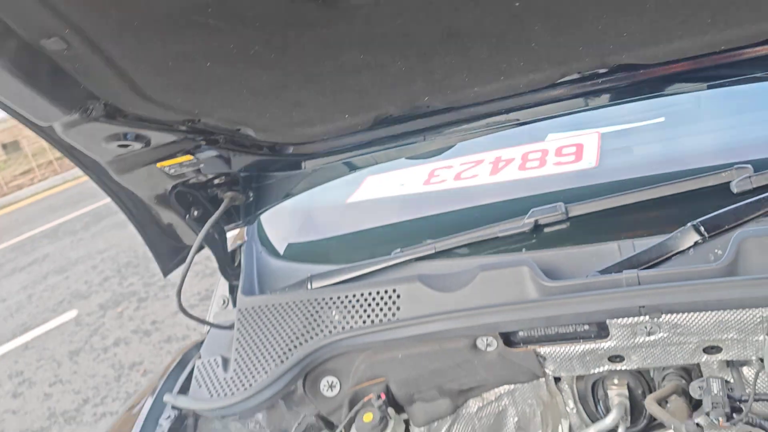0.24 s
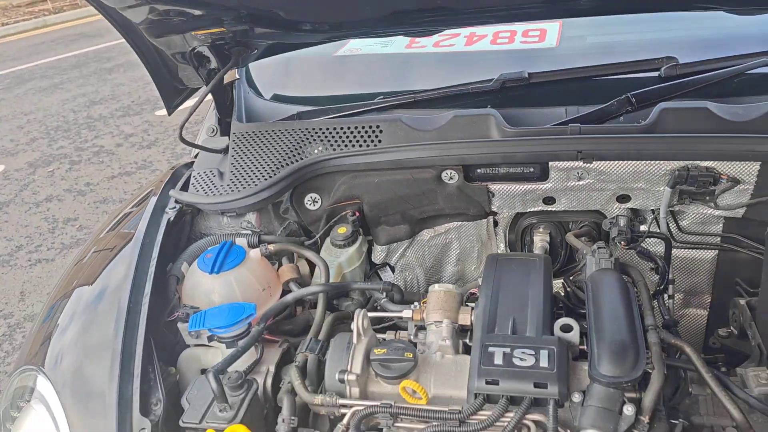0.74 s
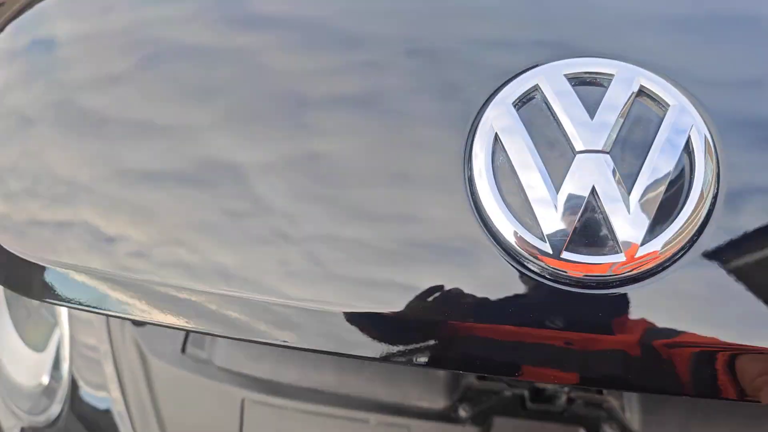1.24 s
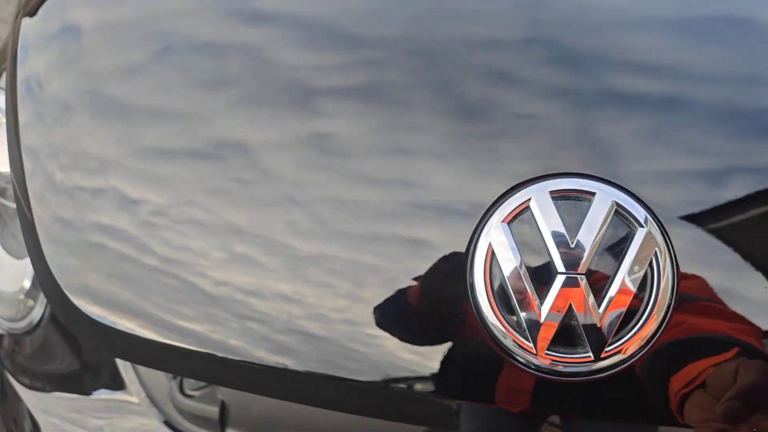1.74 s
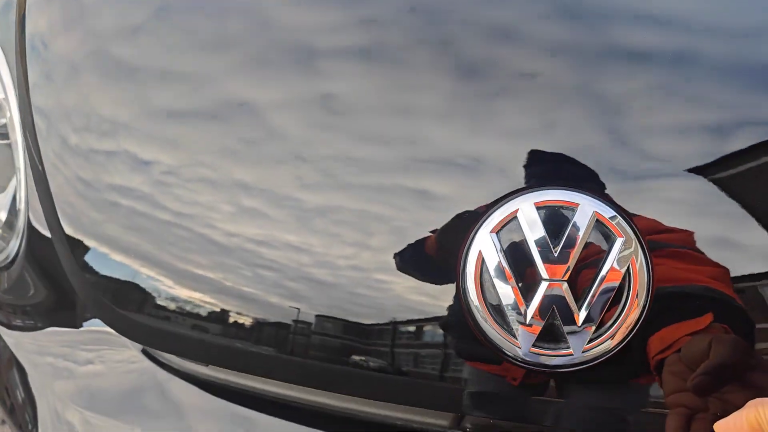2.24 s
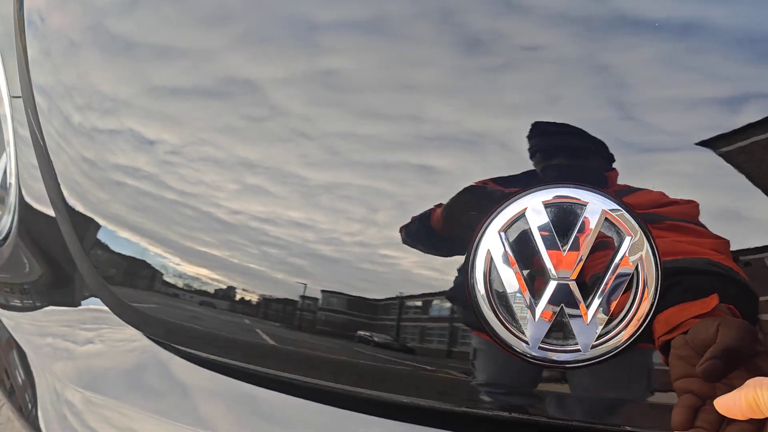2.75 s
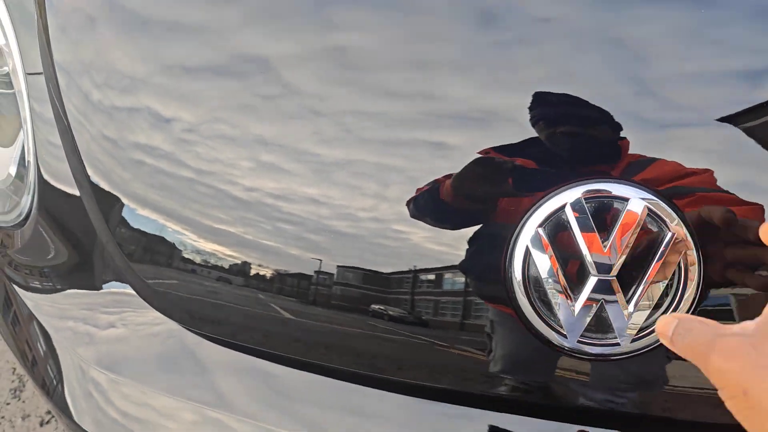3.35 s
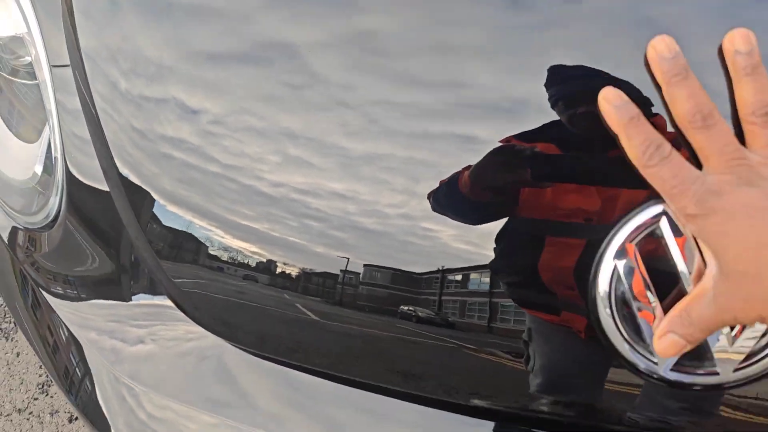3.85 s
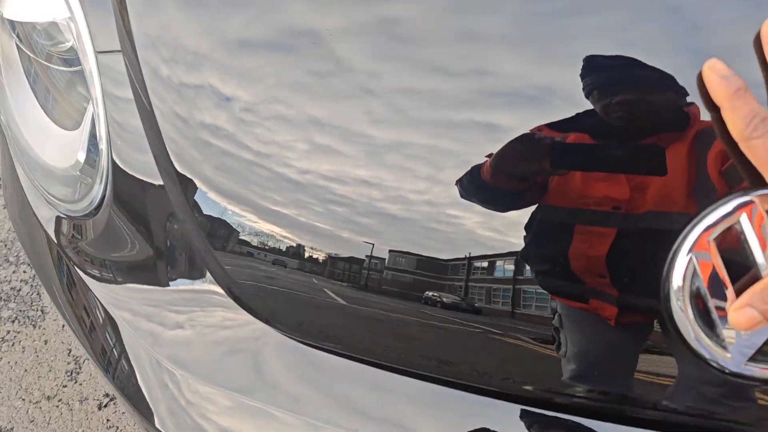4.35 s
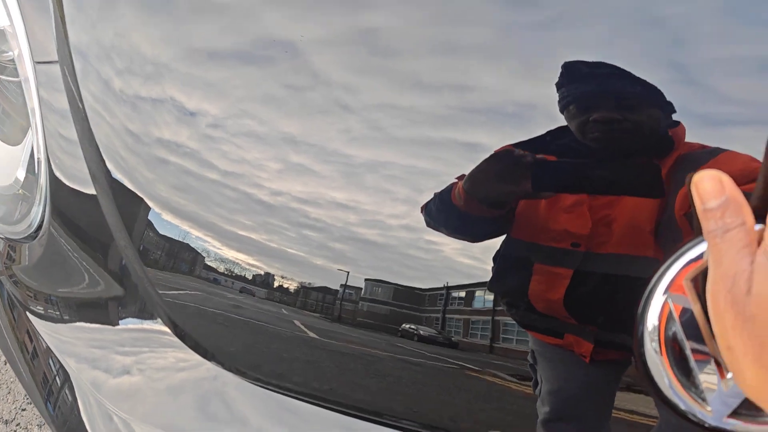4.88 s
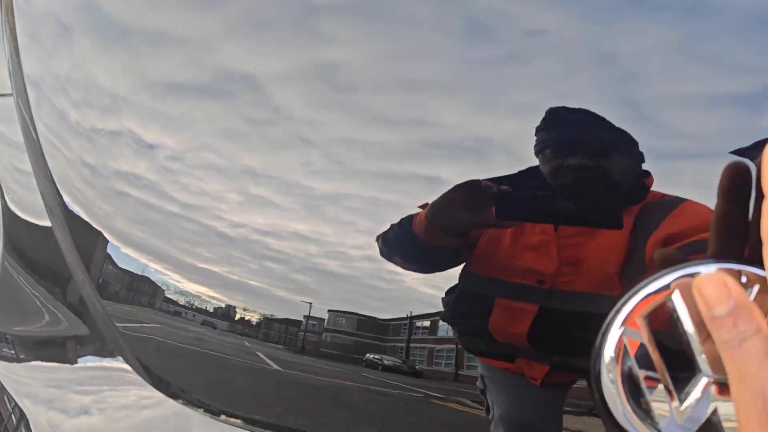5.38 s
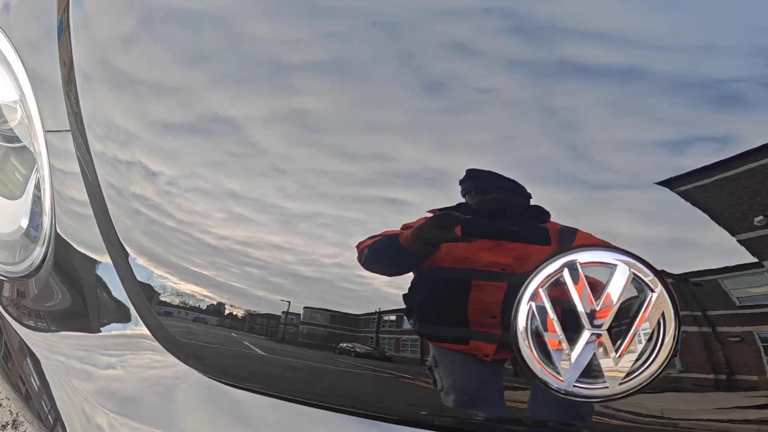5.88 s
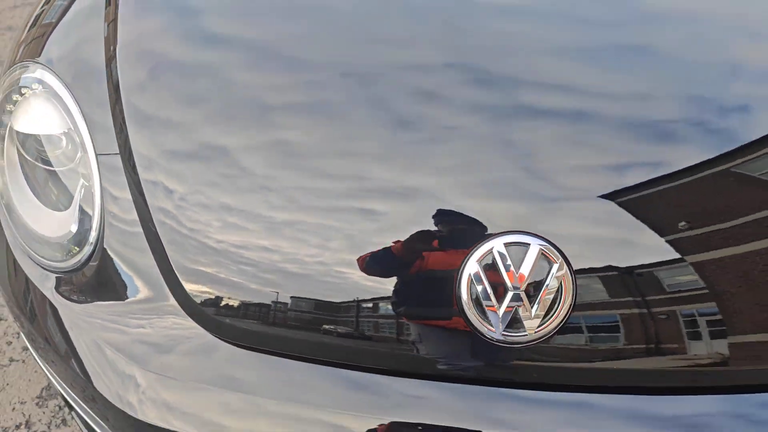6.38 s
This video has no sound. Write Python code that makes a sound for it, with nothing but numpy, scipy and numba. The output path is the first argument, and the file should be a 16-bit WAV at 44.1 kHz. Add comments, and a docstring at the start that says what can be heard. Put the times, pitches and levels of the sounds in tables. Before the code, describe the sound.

In a car park, an engine idles close to a phone microphone, with fast bright ticking, hiss and a thin whine over a low rumble. The bonnet is lowered and the engine turns dull and quiet. The bonnet then drops and is pushed onto its latch, four loud metallic thuds in all, with clanks and sharp cracks. A sleeve swishes faintly while the muffled idle carries on.

```python
"""In a car park, a four-cylinder engine idles under a raised bonnet, with a phone held over it.
Injectors and valves tick at each firing, a pump whines, and exhaust and far traffic rumble.
The bonnet is lowered and muffles the engine, then is dropped and pushed onto its latch four times:
the metal panel thuds and clanks, and the latch cracks. A sleeve swishes between and after the pushes."""
import sys
import numpy as np
from scipy import signal
from scipy.fft import rfft, irfft, next_fast_len
from scipy.io import wavfile
from scipy.ndimage import uniform_filter1d
from numba import njit

SR = 44100
rng = np.random.default_rng(int(sys.argv[2]) if len(sys.argv) > 2 else 0)


def bounce(signal):
    """Save signal as a 16-bit WAV file at the path given by the first command-line argument."""
    frames = np.transpose(np.atleast_2d(signal))
    limited = np.clip(frames, -1, 1)
    pcm = np.round(limited * 32767).astype(np.int16)
    wavfile.write(sys.argv[1], SR, pcm)


N = 291942
FFT = next_fast_len(N)
TIME = np.arange(N) / SR
LEFT_RIGHT = np.array([[1], [-1]])


def undb(db):
    return 10 ** (np.asarray(db) / 20)


def unit(x):
    return x / np.sqrt(np.mean(x ** 2))


def ramp(start, length):
    """0 before start, 1 after start + length."""
    return np.clip((TIME - start) / length, 0, 1)


def over_time(table):
    """Read a table of times and values at every sample."""
    times, *columns = np.transpose(table)
    return [np.interp(TIME, times, column) for column in columns]


def over_hz(table):
    """Read a table of frequencies and values across the spectrum."""
    hz, value = np.transpose(table)
    return np.interp(np.log(np.fft.rfftfreq(FFT, 1 / SR) + 1), np.log(hz), value)


def filtered(x, order, hz, kind="low"):
    return signal.sosfilt(signal.butter(order, hz, kind, fs=SR, output="sos"), x)


def colour(x, spectrum, peaks=(), peaks_db=0.):
    """Give a sound a broad tone colour plus ringing peaks; its strength (rms) comes out as 1."""
    hz, power = np.fft.rfftfreq(FFT, 1 / SR), undb(2 * over_hz(spectrum))
    for centre, width, db in peaks:
        power = power + undb(2 * (db + peaks_db)) / (1 + (2 * (hz - centre) / width) ** 2) ** 2
    # this fold makes the filter ring after a sound, never before it
    cepstrum = irfft(np.log(power) / 2, FFT)
    cepstrum[1:FFT // 2] *= 2
    cepstrum[FFT // 2 + 1:] = 0
    return unit(irfft(rfft(x, FFT) * np.exp(rfft(cepstrum)), FFT)[:, :N])


def wander(rate):
    """A smooth random wobble of about 1, with rate new values a second."""
    hold = int(SR / rate)
    steps = np.repeat(rng.standard_normal(N // hold + 1), hold)
    return 1.72 * uniform_filter1d(uniform_filter1d(steps, hold), hold)[:N]


def fading(seconds, sizes, decay_ms, rise_ms):
    """A loudness curve that jumps at each given time and dies away."""
    kicks = np.zeros(N)
    at = (seconds * SR).astype(int)
    inside = (at >= 0) & (at < N)
    np.add.at(kicks, at[inside], sizes[inside])
    for ms in decay_ms, rise_ms:
        kicks = signal.lfilter([1], [1, -np.exp(-1000 / SR / ms)], kicks)
    return kicks * 1000 / SR / rise_ms


@njit
def ringing(kicks, hz, ring_s):
    """One note of a struck object: each kick starts it, and it falls 60 dB in ring_s."""
    pole = np.exp(2j * np.pi * hz / SR - np.log(1000) / ring_s / SR)
    out = np.zeros(kicks.shape)
    for side in range(len(kicks)):
        state = 0j
        for i in range(kicks.shape[1]):
            state = state * pole + kicks[side, i] + 1e-18
            out[side, i] = state.imag
    return out


# How alike left and right are: f/Hz, likeness/0..1
LIKENESS = [(60, 0.86), (300, 0.89), (640, 0.77), (1400, 0.022), (3000, 0.027), (16000, 0.026)]
# Which side is louder: f/Hz, left minus right/dB
BALANCE = [(60, -1), (110, 0), (200, -2), (380, -2), (700, 2), (1290, 5.5), (2380, 4.5), (4400, 0),
           (8120, 0), (15000, 3)]

def stereo_noise():
    """Noise at the phone's two microphones: alike in the bass, unrelated in the treble."""
    alike = np.clip(over_hz(LIKENESS), 0, 1)
    mid, side = rfft(rng.standard_normal((2, FFT)))
    pair = np.sqrt(1 + alike) * mid + LEFT_RIGHT * np.sqrt(1 - alike) * side
    return unit(irfft(pair * undb(LEFT_RIGHT * over_hz(BALANCE) / 2), FFT)[:, :N])


# Loudness over time: t/s, engine through the bonnet gap/dB, rumble/dB
GAP_AND_RUMBLE_LEVELS = [(0, -29, -45), (.4, -28.5, -49), (.7, -29, -51.5), (1.07, -32.5, -49.5),
                         (1.36, -44.5, -48), (1.6, -50, -52), (2.0, -52.5, -48), (2.4, -55, -51.5),
                         (3.1, -60, -51.5), (4.0, -60, -57.5), (4.5, -64.5, -53), (5.0, -63, -60.5),
                         (5.8, -60, -57.5), (6.62, -60, -62.5)]
# Tone colour of the rumble: f/Hz, level/dB
RUMBLE_COLOUR = [(15, -42), (25, -20), (38, -10.5), (59, -10), (76, -6.5), (97, 5.5), (210, -1.5),
                 (264, -1), (353, -9), (450, -9.5), (580, -37), (990, -120)]

def rumble():
    """Exhaust and far traffic make a low, uneven noise."""
    _, level_db = over_time(GAP_AND_RUMBLE_LEVELS)
    return undb(level_db + 1.76 * wander(20.96)) * colour(stereo_noise(), RUMBLE_COLOUR)


# Brushes of the sleeve: t/s, length/s, level/dB
SWISHES = [(3.497, 0.26, -58.5), (5.59, 0.17, -56), (5.748, 0.28, -49)]
# Tone colour of the cloth: f/Hz, level/dB
CLOTH_COLOUR = [(1180, -20), (2000, 1), (2160, -13), (2340, 0.5), (5630, 1), (8400, -8), (12900, 0.5),
                (16000, -12)]

def sleeve():
    """Cloth rubs on cloth: soft swells of high hiss."""
    swell = sum(undb(db) * np.sin(np.pi * ramp(start, length)) ** 0.98 for start, length, db in SWISHES)
    return swell * undb(0.75 * wander(40)) * colour(stereo_noise(), CLOTH_COLOUR)


def idle_swell():
    """Goes from 0 to 1 and back as the whine and muffled engine swell between two pushes."""
    return ramp(4.47, 0.23) - ramp(5.2, 0.23)


def pump_whine(pitch_hz=1009, sag_hz=26, waver_hz=5.98, hiss_width_hz=57):
    """A belt-driven pump sings a wavering tone in a narrow hiss; it sags as the bonnet comes down."""
    hz = pitch_hz - sag_hz * (ramp(.3, .7) - .5 * ramp(1.2, 0.508)) + waver_hz * wander(25)
    tone = np.exp(2j * np.pi * np.cumsum(hz) / SR)
    sway = filtered(rng.standard_normal((2, 2, N)), 2, hiss_width_hz / 2)
    hiss = unit(((sway[0] + 1j * sway[1]) * tone).real)
    whine = tone.real * undb(-4 + 1.1 * wander(40)) + undb(-1) * hiss
    # loudest while the phone points down at the engine
    facing = ramp(0.071, 0.17) - ramp(0.91, 0.22)
    level = undb(-63.5) + facing * undb(-39.5) + idle_swell() * undb(-62)
    return level * whine * undb(3 * LEFT_RIGHT)


# The idle speed drifts a little: t/s, lead over a steady beat/firings
IDLE_DRIFT = [(0, .58), (.6, .63), (1.1, .58), (1.7, .53), (2.2, .58), (2.7, .645), (3.4, .56), (4.4, .7),
              (4.8, .72), (5.8, .95), (6.62, .91)]
# Ticks: delay after a firing/ms, every n-th firing, then level/dB in each of six bands, low to high
TICKS = [(-2, 1, -20, -9, 14, 3, 6, 11), (6, 1, -20, -9, 2, 3, 9, -3), (13, 1, -20, -9, -6, 10, 12, 12),
         (18, 1, -20, 4, -9, 12, 10, -3), (23.5, 1, -20, 1, 1, -9, -9, 11), (29, 1, -20, 3, -9, -9, -9, -9),
         (79.5, 2, -20, -3, -6, -2, 2, 8), (17, 2, 3, 9, -20, -20, -20, -20),
         (23, 2, 7, -20, -20, -20, -20, -20), (42, 4, 4, -20, -20, -20, -20, -20),
         (178, 4, 4, -20, -20, -20, -20, -20)]
# Borders of the six bands: f/Hz
BAND_EDGES = [1120, 1600, 3600, 5300, 7100, 9600, 16500]
# One value for each band:
BAND_DECAY = [7, 6.5, 3.5, 2.8, 3, 2]  # fade time of a tick/ms
BAND_HISS = [4, 5, 1, -1, -1, 0]  # steady hiss level/dB
RING_PITCH = [1300, 2157, 4400, 6360, 7950, 11450]  # a small ringing part: f/Hz
RING_LEVEL = [3, 4, 2, -5, -3, -8]  # its level/dB
RING_WOBBLE = [.012, .012, .025, .035, .04, .035]  # its wobble/fraction of the pitch
# The two lowest rings come and go as the phone moves: t/s, first ring/dB, second ring/dB
RING_CHANGES = [(0, 7, -1), (.2, 0, -3), (.45, -7, -9), (.65, 5.5, 1), (1.05, 6, 0), (1.25, 2.5, 1),
                (1.5, 2, 0), (1.68, -1, -6), (1.85, 1, -2), (2.1, -1, 0), (2.3, -3, -7), (3.5, 0, -7),
                (3.72, -3, 4), (4., -3, 6), (4.2, -5, -8), (5.2, -5, -5), (5.5, -1, -3.5), (6., -5, -9),
                (6.3, -1, -5)]
# At times a higher part takes over the second ring: t/s, f/Hz
SECOND_RING_PITCH = [(1.15, 2165), (1.19, 2440), (1.65, 2440), (1.69, 2165), (5.4, 2165), (5.45, 2440)]

def engine(ring_db, rise_ms, hiss_db, firing_hz=21.55, scatter_db=2.2, jitter_ms=0.9):
    """At each injector or valve tick, the engine's hiss flares up and small parts ring."""
    progress = firing_hz * TIME + over_time(IDLE_DRIFT)[0]
    count = np.arange(int(progress[-1]) + 1)
    firing_s = np.interp(count, progress, TIME, left=-progress[0] / firing_hz)
    noise = stereo_noise()
    out = filtered(noise, 4, BAND_EDGES[0]) * undb(1.9 * wander(12))
    late, louder = rng.standard_normal((len(count), 2, len(TICKS))).transpose(1, 0, 2)
    delay_ms, every, *tick_db = np.transpose(TICKS)
    tick_s = firing_s[:, None] + (delay_ms + jitter_ms * late) / 1000
    for band, decay_ms in enumerate(BAND_DECAY):
        sizes = (count[:, None] % every == 0) * undb(tick_db[band] + scatter_db * louder)
        flare = fading(tick_s.ravel(), sizes.ravel(), decay_ms, rise_ms)
        loudness = undb(hiss_db + BAND_HISS[band]) + flare
        hz = over_time(SECOND_RING_PITCH)[0] if band == 1 else RING_PITCH[band]
        phase = 2 * np.pi * np.cumsum(hz * (1 + RING_WOBBLE[band] * wander(60))) / SR
        tone = np.sin(phase + [[0], [2 * np.pi * rng.random()]])  # left and right out of step
        change_db = over_time(RING_CHANGES)[band] if band < 2 else 0
        ring_gain = undb(ring_db + RING_LEVEL[band] + change_db) * np.sqrt(RING_PITCH[band] / SR)
        hiss = np.roll(noise, 999 * (band + 1), axis=1) * loudness * undb(1.15 * wander(4.895))
        ring = ring_gain * tone * flare * undb(2 * wander(2.52))
        ticking = (hiss + ring) / np.sqrt(np.mean(loudness ** 2))
        out = out + filtered(ticking, 3, BAND_EDGES[band:band + 2], "band")
    return out


# Tone colour through the gap under the bonnet: f/Hz, level/dB
GAP_COLOUR = [(88, -43), (150, -27.5), (264, -7), (439, -45), (555, -10.5), (837, -13), (998, -6),
              (1600, -11), (2140, -10.5), (2600, -10), (7920, -13), (9630, -17), (13200, -9.5),
              (16000, -21.5)]
# Its ringing peaks (the second is not played): f/Hz, width/Hz, level/dB
GAP_PEAKS = [(545, 8.1, -3), (996, 39, 0), (1303, 120, -8), (2182, 77, -7.5), (2426, 15, -0.5),
             (2850, 8, -1), (4050, 270, -4.5), (4605, 123, -7), (5900, 180, -13), (6320, 150, -9),
             (7970, 600, -12), (11180, 1100, -12.5), (12800, 280, -19)]

def engine_through_gap():
    """Bright ticking escapes under the bonnet and fades as the gap closes."""
    level_db, _ = over_time(GAP_AND_RUMBLE_LEVELS)
    ticking = engine(ring_db=1, rise_ms=1.8, hiss_db=-4.2)
    return undb(level_db) * colour(ticking, GAP_COLOUR, GAP_PEAKS[:1] + GAP_PEAKS[2:], peaks_db=0.96)


# Tone colour through the metal panel: f/Hz, level/dB
PANEL_COLOUR = [(180, -53), (300, -47.5), (462, -30), (528, 2), (900, -7.5), (994, -1.5), (1840, -5.5),
                (2140, -4), (2700, -8), (4300, -13.5), (5250, -20), (13300, -41), (16000, -36)]
# Its ringing peaks: f/Hz, width/Hz, level/dB
PANEL_PEAKS = [(510.7, 65, 4.5), (1005, 17, -13), (1284, 20, -3), (1606, 25, -22), (2178, 26, -20),
               (2432, 24, 3.5), (3120, 140, -4.5), (4370, 130, -12.5), (5990, 120, -16),
               (7670, 1700, -24.5)]

def engine_through_panel(lowered_s=0.95, lowering_s=0.18, fade_db_per_s=1.1754):
    """The lowered bonnet passes on a dull, smeared engine, which fades as the phone backs off."""
    lowered = ramp(lowered_s - lowering_s, lowering_s)
    fade_db = fade_db_per_s * np.maximum(TIME - lowered_s, 0)
    level_db = -51.5 + 6.5 * lowered - fade_db + 1.5 * idle_swell()
    ticking = engine(ring_db=2, rise_ms=2.8, hiss_db=.5)
    return undb(level_db) * colour(ticking, PANEL_COLOUR, PANEL_PEAKS, peaks_db=0.32)


BONNET_PAN_DB = -1.4  # left minus right
# Taps of a hand on the panel: t/s, f/Hz, level/dB
HAND_TAPS = [(2.884, 690, -26.5), (2.893, 480, -28), (2.978, 680, -23), (3.109, 590, -18.5),
             (5.229, 775, -13.5), (5.889, 395, -30.5), (5.906, 402, -37), (5.925, 480, -39)]

def hand_taps(ring_s=0.03):
    """The hand damps the metal, so each tap is short and dull."""
    out = np.zeros(N)
    t = TIME[:int(ring_s * SR)]
    for start, hz, db in HAND_TAPS:
        at = int(start * SR)
        loudness = undb(db - 60 * t / ring_s) * np.minimum(t * hz, 1)
        out[at:at + len(t)] -= loudness * np.sin(2 * np.pi * hz * t)
    return out * undb(LEFT_RIGHT * BONNET_PAN_DB / 2)


# Cracks of the latch: t/s, level/dB
LATCH_CRACKS = [(2.565, -22.5), (2.988, -25.5), (2.995, -34), (3.001, -20.5), (3.01, -16.5), (3.021, -23),
                (3.031, -17), (3.043, -30), (3.053, -29.5), (4.058, -42), (4.071, -36), (5.231, -34),
                (5.244, -35), (5.253, -30), (5.259, -12), (5.265, -29), (5.292, -42), (5.427, -49),
                (5.665, -56)]
# Their tone colour: f/Hz, level/dB
LATCH_COLOUR = [(880, -60), (1500, -1.5), (2390, -2.5), (2970, -1.5), (4200, -5), (5440, -5), (5880, -4),
                (7100, -10.5), (7840, -10), (9100, -16), (13000, -11.5), (15100, -24), (16000, -29)]
# Notes of the latch spring: f/Hz, level/dB, ring time/s
SPRING_NOTES = [(2370, -11.5, 0.058), (2950, -17, 0.068), (5850, -12.5, 0.045), (6480, -14.5, 0.041),
                (7810, -13.5, .03)]

def latch():
    """Each crack is a hard burst with a softer trail, and sets the spring ringing."""
    times, db = np.transpose(LATCH_CRACKS)
    burst = fading(times, undb(db), decay_ms=2.75, rise_ms=0.78)
    trail = fading(times, undb(db - 14.5), decay_ms=13.3, rise_ms=1.6)
    out = (burst + trail) * colour(stereo_noise(), LATCH_COLOUR)
    chance = rng.random((len(times), len(SPRING_NOTES), 3))
    for k, (hz, note_db, ring_s) in enumerate(SPRING_NOTES):
        sizes = undb(db + note_db + 8.5 * chance[:, k, 0])
        kicks = np.zeros((2, N), complex)
        kicks[:, (times * SR).astype(int)] = sizes * np.exp(2j * np.pi * chance[:, k, 1:].T)
        out = out + ringing(kicks, hz, ring_s)
    return out


# Blows on the bonnet, with relative levels: t/s, thud/dB, clank/dB, bright clank/dB, hollow knock/dB
BONNET_BLOWS = [(2.564, -7, -17.5, -33, -32.5), (2.62, -25.5, -27.5, -55, -43),
                (2.695, -29.5, -45, -56, -60), (2.727, -37, -44, -55, -39), (2.849, -31, -42, -48, -60),
                (2.885, -29, -29, -56, -43), (2.965, -25, -32, -55, -50), (2.979, -28, -24, -45, -27),
                (2.993, -10, -11.5, -20.5, -22), (3.005, -17, -11, -30, -9.5), (3.012, -40, -15, -13, -9.5),
                (3.031, -41, -17, -18.5, -11), (3.043, -42, -18, -21, -20), (3.085, -23.5, -27.5, -52, -44),
                (3.11, -30.5, -29, -53, -49), (3.155, -34, -34, -55, -49), (3.185, -43, -58, -55, -60),
                (4.056, -7, -21, -28, -14), (4.07, -8.5, -16, -25.5, -11.5), (4.102, -10, -25.5, -36, -35),
                (4.135, -26, -23, -42, -40), (4.172, -25, -48, -64, -60), (4.225, -29.5, -52, -62, -60),
                (4.36, -17.5, -50, -60, -62), (4.429, -23, -33.5, -41, -48), (4.47, -34.5, -44, -60, -60),
                (4.514, -39, -58, -51, -60), (5.204, -21, -33, -55, -39), (5.212, -17, -31, -55, -42),
                (5.229, -3, -26, -50, -33), (5.242, -13, -14.5, -13.5, -27),
                (5.257, -18, -13.5, -21.5, -30), (5.295, -13, -20, -33, -35), (5.32, -14.5, -27, -53, -50),
                (5.345, -39, -34, -50, -35), (5.385, -30, -54, -62, -60), (5.46, -39, -60, -60, -61),
                (5.572, -39, -70, -58, -70), (5.891, -44, -47, -58.5, -62)]
# Notes of the metal panel: f/Hz, level/dB, ring time/s
PANEL_NOTES = [(80.7, -9, 0.26), (87.15, -11, 0.54), (114.6, -0.5, 0.16), (158.2, -8, 0.32), (170, 1, 0.36),
               (187.2, -1, 0.3), (238, -13, 0.2), (267, -10.5, 0.1), (323, -11.5, 0.15), (364, -6, 0.18),
               (397, -3.5, 0.24), (429, -15, 0.32), (512, -3.5, 0.28), (560, -6, 0.26), (608, -2, 0.12),
               (706, -4, 0.16), (886, -5.5, 0.096), (999, -9, 0.085), (1157, -6.5, 0.11), (1400, -2, 0.035),
               (1435, -5, 0.085), (1676, 1.5, 0.098), (1835, -1.5, 0.095), (2050, -7, .1)]
# Notes of the hollow between the bonnet's two skins: f/Hz, level/dB, ring time/s
HOLLOW_NOTES = [(780, 1.5, 0.053), (850, -3, 0.07), (1484, -5, 0.11), (1567, -2, 0.058)]

def bonnet(scatter_db=2.5, push_ms=3.24, clank_from_hz=370, bright_from_hz=1100):
    """Each blow rings the panel and its hollow, every note by its own share, and shakes loose parts."""
    times, thud, clank, bright, knock = np.transpose(BONNET_BLOWS)
    at = (times * SR).astype(int)
    pan_db = BONNET_PAN_DB + rng.standard_normal(len(times))
    sides = undb(LEFT_RIGHT * pan_db / 2)
    notes = PANEL_NOTES + HOLLOW_NOTES
    chance = rng.standard_normal((len(times), 2, len(notes)))
    out = 0
    for k, (hz, db, ring_s) in enumerate(notes):
        low = hz < clank_from_hz
        panel_db = thud - 8 if low else clank - 6 if hz < bright_from_hz else bright - 4
        blow_db = panel_db if k < len(PANEL_NOTES) else knock
        scatter, skew = chance[:, :, k].T
        # high notes reach left and right out of step, and start anywhere in their swing
        phase = hz / 2500 * skew * LEFT_RIGHT + (not low) * 3 * scatter
        sizes = undb(db + blow_db + scatter_db * (.5 if low else 1) * scatter) * sides * np.exp(1j * phase)
        # rubber stops spread the push over time
        push = np.hanning(int(push_ms / 1000 * SR * min(1, 300 / hz)) + 3)
        during = at[:, None] + np.arange(len(push))
        kicks = np.zeros((2, N), complex)
        np.add.at(kicks, (slice(None), during), sizes[..., None] * push / push.sum())
        out = out + ringing(kicks, hz, ring_s)
    # loose parts under the panel rattle on as dense noise, the bass longest
    for band_hz, decay_ms, db in (([67, 220], 45.3, thud - 17.5), ([316, 695], 25, clank - 12),
                                  ([1040, 1930], 18, bright - 7)):
        rattle = unit(filtered(stereo_noise(), 2, band_hz, "band"))
        out = out + fading(times, undb(db), decay_ms, rise_ms=0.99) * rattle * undb(2.3 * wander(60))
    # the thuds are heard without their deepest bass, cut below about 80 Hz
    return filtered(out, 6, 82, "high")


def scene():
    idle = engine_through_gap() + engine_through_panel() + rumble() + pump_whine()
    return idle + bonnet() + latch() + sleeve() + hand_taps()


def record(dry, top_hz=16000):
    """The phone rounds off the loudest peaks and cuts the highest treble."""
    rounded = np.tanh(1.09 * dry) / 1.118
    return signal.sosfilt(signal.ellip(10, .2, 60, top_hz, fs=SR, output="sos"), rounded)


dry = scene()
out = record(dry)
bounce(out)
```